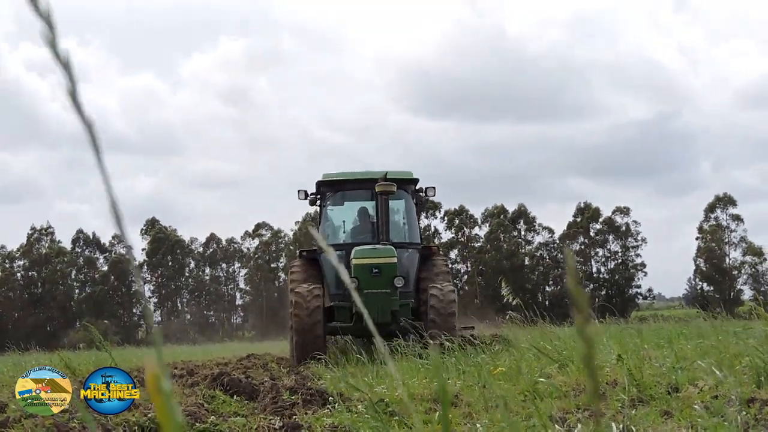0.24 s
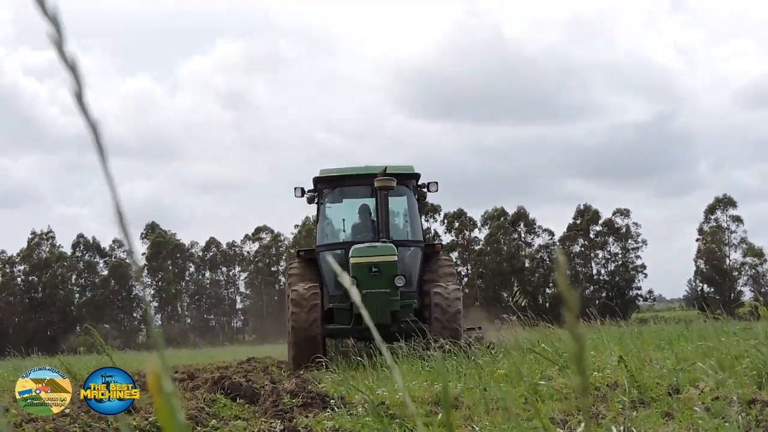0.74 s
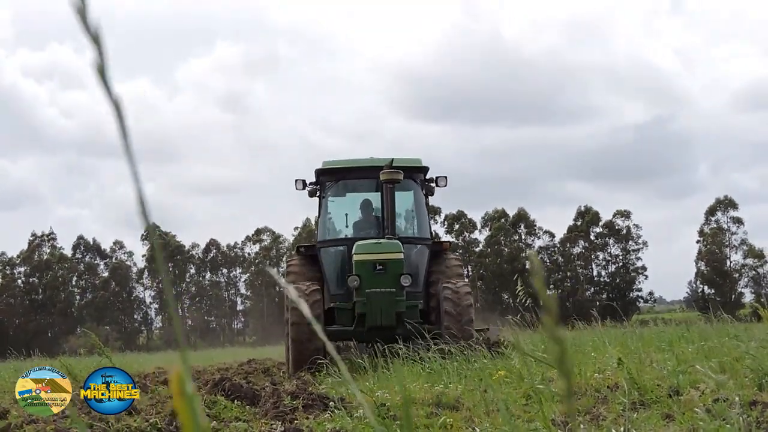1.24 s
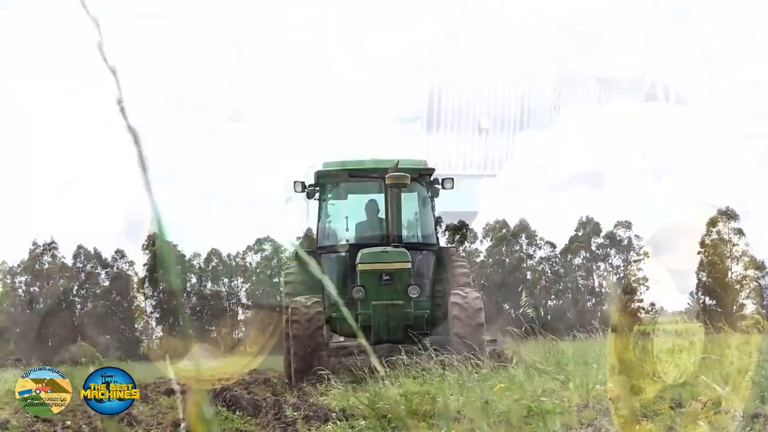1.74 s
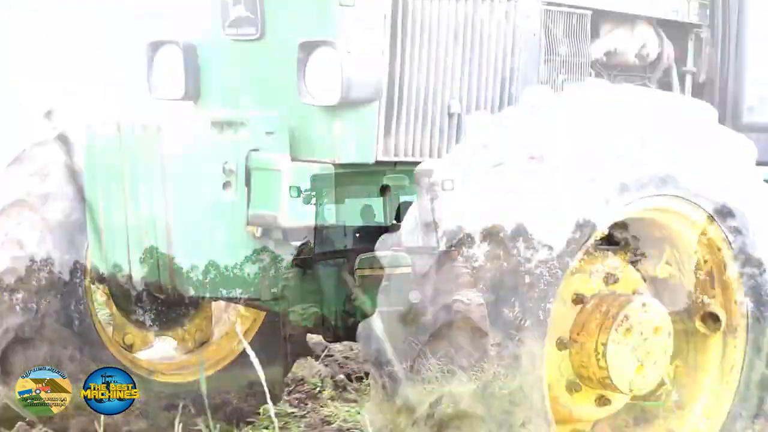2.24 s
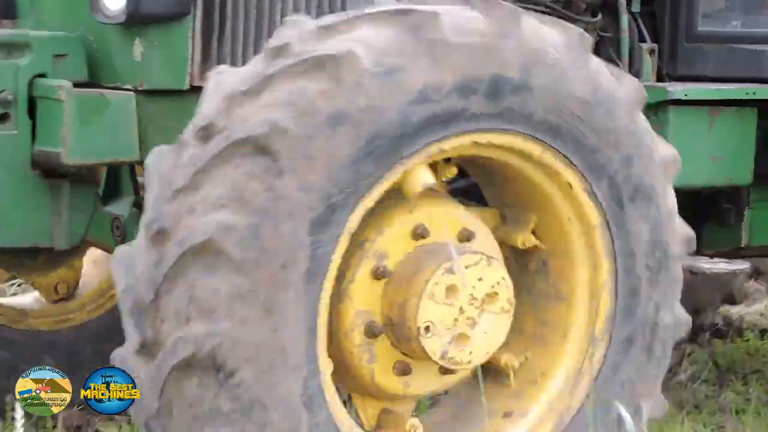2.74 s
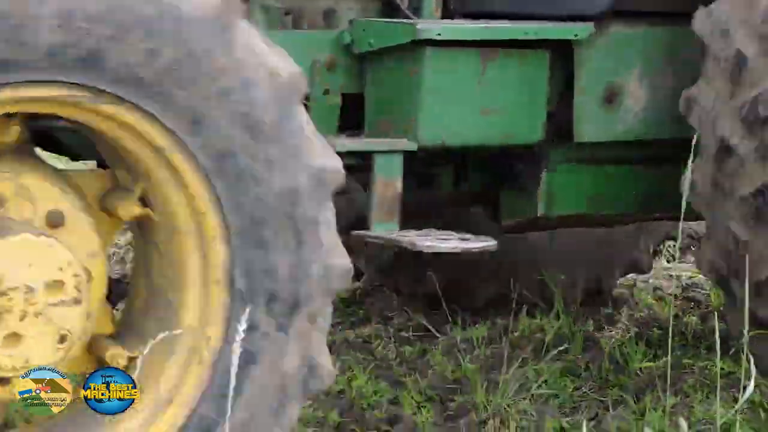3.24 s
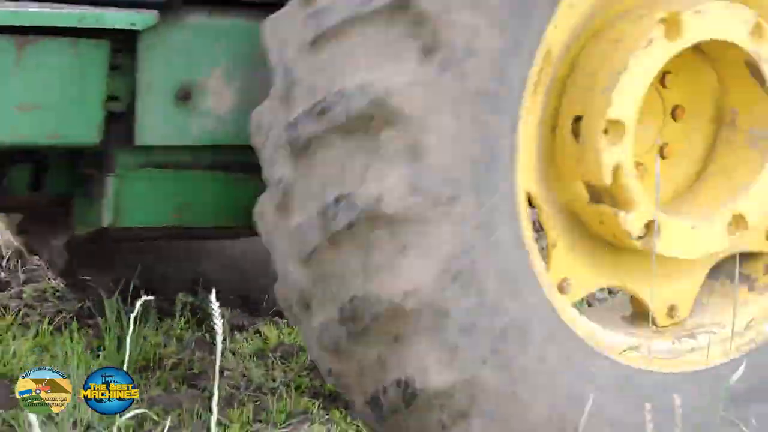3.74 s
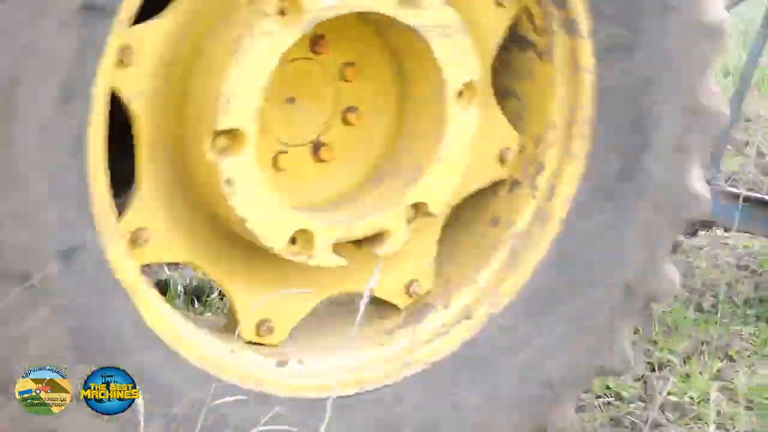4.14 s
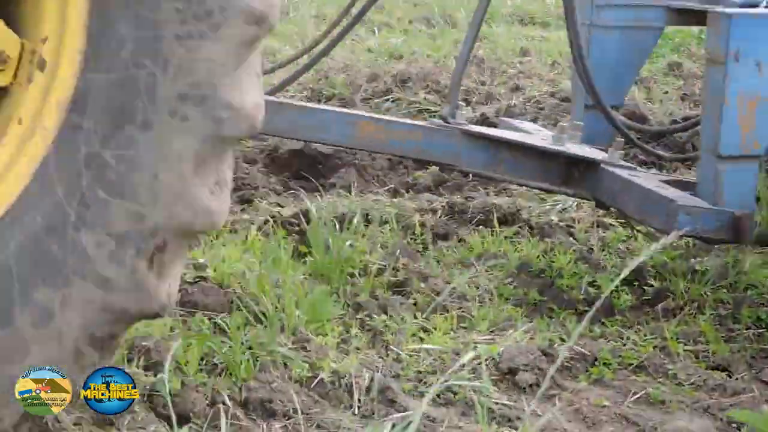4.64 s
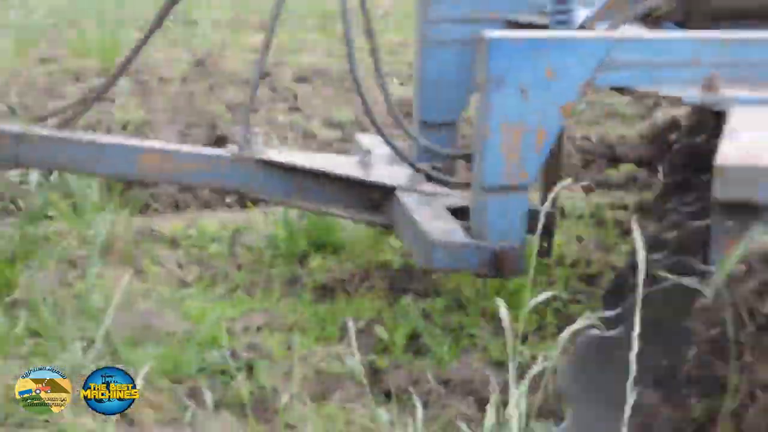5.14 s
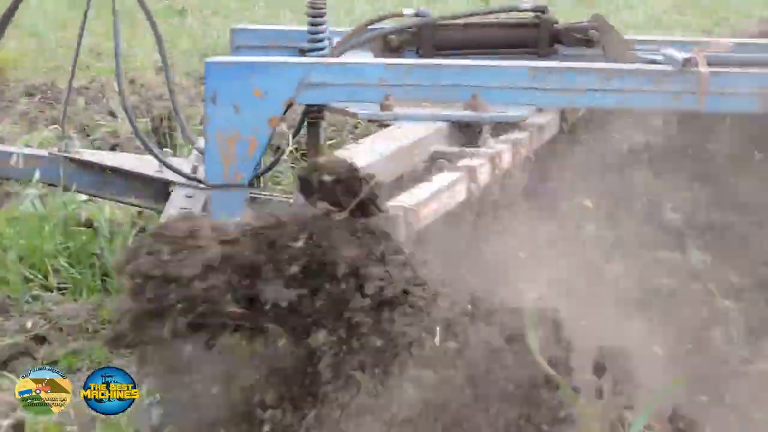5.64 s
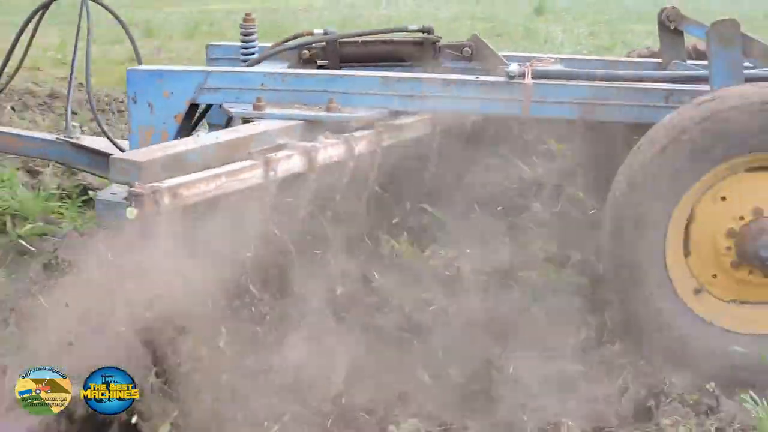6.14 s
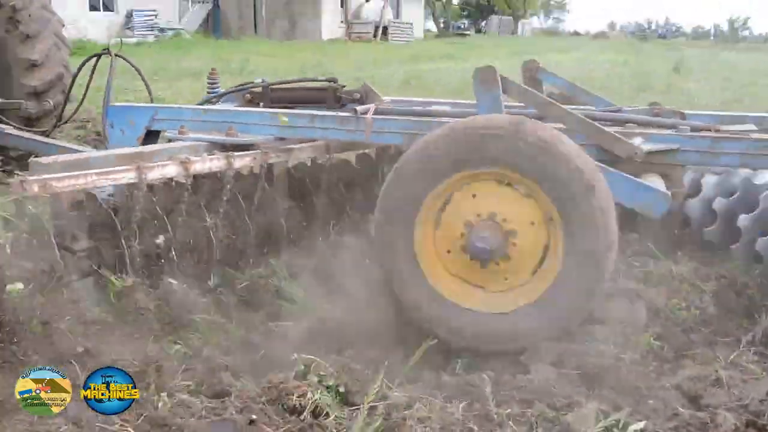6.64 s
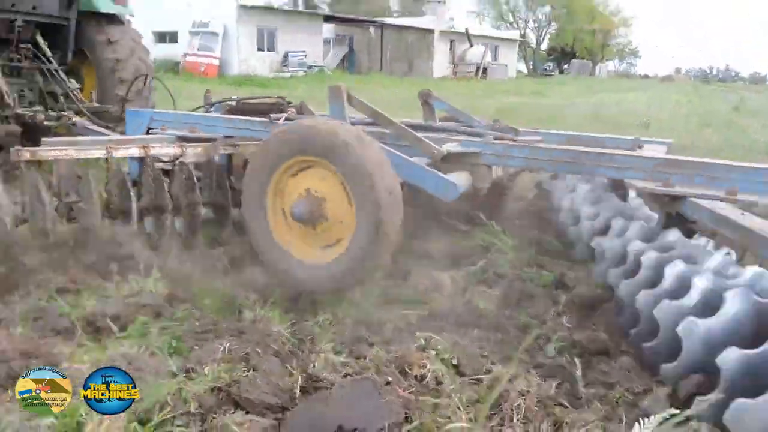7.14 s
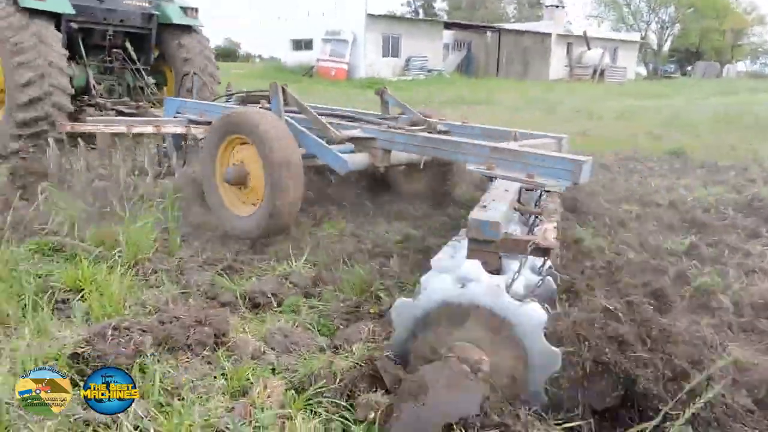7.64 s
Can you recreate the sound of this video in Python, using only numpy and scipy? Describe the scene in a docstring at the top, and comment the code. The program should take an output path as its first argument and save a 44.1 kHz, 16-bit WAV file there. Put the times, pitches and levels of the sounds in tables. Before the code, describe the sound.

A diesel tractor drones far off in wind, fades to silence, then cuts in close, clattering past as harrow discs crumble and thump through soil.

```python
"""A windy open field, where a diesel tractor pulls a disc harrow: first heard head-on from afar, fading
out, then close by, swelling and receding past a stereo microphone and labouring as the discs bite.
Each firing gives an exhaust throb (sines at orders of the firing rate), a knock in the block, a tick and
an injector ping (gated, coloured noise). The discs crumble and scrape the soil (grainy noise), stones
ring, clods thump down (decaying tones), a low swoop rises, and wind noise buffets the microphone ports."""
import sys
import numpy as np
from scipy import signal
from scipy.fft import rfft, irfft, next_fast_len
from scipy.io import wavfile
from scipy.ndimage import uniform_filter1d, map_coordinates

SR = 44100
rng = np.random.default_rng(int(sys.argv[2]) if len(sys.argv) > 2 else 0)


def put_to_file(sound):
    """Save the sound as 16-bit audio at rate SR, in the file named by the first command-line argument."""
    columns = np.atleast_2d(sound).T  # one column per channel
    safe = np.clip(columns, -1, 1)
    whole_steps = np.round(safe * 32767)
    wavfile.write(sys.argv[1], SR, whole_steps.astype(np.int16))


N = 347508
TIME = np.arange(N) / SR
FADE_END_S = 2.0  # end of the far view

# Engine speed, surging over the bumps and sagging as the discs bite.
# Each row: time in seconds, firings per second [Hz].
FIRING_RATE = [(0, 61.7), (0.75, 63.8), (1.6, 62.5), (2.1, 61.5), (2.4, 64.1), (2.62, 60.8), (2.87, 62.4),
               (3.08, 61.3), (3.39, 61.1), (3.69, 63.4), (3.9, 59.9), (4.09, 62.9), (4.58, 60.7),
               (4.75, 63), (5.05, 61.6), (5.4, 59.9), (5.8, 59.1), (6.7, 61.4), (7.88, 63.2)]
# The four cylinders in firing order.
# Each row: knock, tick, injector ping and head-on rap, all relative levels in dB.
CYLINDER_LEVELS = [(-3, 11, -1, 1), (-3.5, 7.5, 4, -0.5), (-3.5, 11, -15.5, -0.5), (-4.5, 9.5, 1.5, 2)]
# Share of each side of the engine that faces the microphone; the rest is flank.
# Each row: time in seconds, front share 0-1, rear share 0-1.
FACING = [(0, 1, 0), (2, 1, 0), (2.03, 0, 0), (3.3, 0, 0), (4.1, 0, 1), (7.88, 0, 1)]
# Left-right likeness of the engine, head-on from afar. Each row: frequency in Hz, correlation 0-1.
LIKENESS_AFAR = [(100, 1), (1000, 0.9), (6000, 0.91), (12000, 0.79)]
# Passage of the knock: level afar in dB, closest level in dB, closest time in seconds,
# approach in seconds, retreat in seconds, steepness as an exponent.
KNOCK_PASSAGE = (-32.5, -20.5, 3.5, 2, 2.0, 4)


def amp(db):
    """The decibel law: 20 dB for each factor of ten in amplitude."""
    return 10 ** (np.asarray(db) / 20)


def unit(x):
    """Normalisation of power: scale to rms 1."""
    return x / np.sqrt(np.mean(x ** 2) + 1e-20)


def along(points, hz):
    """Interpolation of (Hz, value) points on a logarithmic frequency axis."""
    f, v = np.transpose(points)
    return np.interp(np.log(hz + 1), np.log(f + 1), v)


def curves(rows):
    """Linear interpolation in time: one curve for each column after the time."""
    s, *columns = np.transpose(rows)
    return [np.interp(TIME, s, column) for column in columns]


def wobble(rate):
    """Slow random modulation: a smooth curve through random knots, rate of them a second."""
    coarse = TIME[::32]
    knots = rng.standard_normal(int(N * rate / SR) + 4)
    return np.interp(TIME, coarse, map_coordinates(knots, [coarse * rate]))


def filtered(x, response):
    """Linear filtering: the spectrum of x is multiplied by a response of frequency."""
    size = x.shape[-1]
    m = next_fast_len(size + 8192)
    return irfft(rfft(x, m) * response(np.fft.rfftfreq(m, 1 / SR)), m)[..., :size]


def stereo(pair, alike):
    """Partial coherence: mid and side from two unrelated signals set the left-right correlation."""
    turn = lambda hz: np.arccos(np.clip(along(alike, hz), -1, 1)) / 2
    mid = filtered(pair[0], lambda hz: np.cos(turn(hz)))
    side = filtered(pair[1], lambda hz: np.sin(turn(hz)))
    return np.array([mid + side, mid - side])


def colour(spectrum, resonances=()):
    """Spectral shaping: narrow peaks and notches, in dB, on top of a smooth spectrum."""
    peaks = lambda hz: sum(db / (1 + (2 * (hz - f) / width) ** 2) for f, width, db in resonances)
    return lambda hz: amp(along(spectrum, hz) + peaks(hz))


def panel_modes(depth_db, spacing_hz=85):
    """Modal overlap: countless small modes of sheet metal ripple a response."""
    knots = rng.standard_normal(int(SR / spacing_hz) + 4)
    depth = lambda hz: depth_db * np.interp(hz, [400, 1200, 4000, 8000], [0, 1, 1, 0.59])
    return lambda hz: amp(depth(hz) * map_coordinates(knots, [hz / spacing_hz]))


def bursts(rows, octaves, alike, attack, grain_db):
    """Band-limited noise in short grainy swells, each around its own centre.

    Each row: centre time in seconds, level in dB, centre frequency in Hz, length in seconds.
    The attack is a share of the length.
    """
    grains_per_s = 4500
    out = np.zeros((2, N + SR))
    t = np.arange(-SR // 8, SR // 8) / SR
    for s, db, centre_hz, length in rows:
        band = lambda hz: 1 / (1 + (np.log2((hz + 1) / centre_hz) / octaves) ** 4)
        swell = np.exp(-2 * (t / np.where(t < 0, attack * length, length)) ** 2)
        # grain strength varies from one millisecond to the next
        knots = np.clip(rng.standard_normal(len(t[::40])), -2, 2)
        grain = amp(grain_db * np.interp(t, t[::40], knots))
        grain = grain * (rng.random(len(t)) < grains_per_s / SR)
        noise = filtered(grain * rng.standard_normal((2, len(t))), band)
        puff = stereo(noise, [(100, alike)]) * swell
        level = amp(db) * np.sqrt(np.mean(swell ** 2))
        out[:, round((s + t[0]) * SR):][:, :len(t)] += level * unit(puff)
    return out[:, :N]


def wind():
    """Turbulence: slow eddies rumble and small ones flutter, only partly alike at the two ports."""
    # Strength of the wind on the ports. Each row: time in seconds, rumble level in dB.
    strength = [(0, -31.5), (0.62, -28.5), (0.82, -28.5), (1.3, -29), (3.2, -27.5), (4.3, -31),
                (5.5, -24.5), (6.3, -25), (7.88, -23)]
    # Drifting left-right balance of the wind noise.
    # Each row: time in seconds, left-right difference in dB.
    balance_drift = [(0, 3.5), (1, -8.5), (2.1, 2), (4.5, 4), (5.3, 13), (6.5, -6), (7.2, 10.5),
                     (7.88, 4.5)]
    # Spectra of slow and small eddies. Each row: frequency in Hz, relative density in dB per Hz.
    rumble_spectrum = [(10, -24), (25, 2.5), (45, -3), (80, -2), (140, -2.5), (300, -45), (800, -55.5)]
    flutter_spectrum = [(40, -33.5), (100, -1), (170, 1.5), (280, 0), (450, -14.5), (800, -13.5),
                        (2000, -70), (5000, -94)]
    # Single buffets. Each row: time in seconds, level in dB ahead of a common boost,
    # centre frequency in Hz, length in seconds.
    buffet_rows = [(.755, -15, 55.4, 0.022), (.88, -25.5, 135, 0.024), (1.17, -21.5, 92, 0.045),
                   (2.08, -17, 64.5, 0.058), (2.56, -27, 130, 0.029), (5.53, -20, 140, 0.05),
                   (6.14, -18, 108.7, .03), (6.585, -21.5, 110, 0.027), (6.765, -16, 70, 0.019),
                   (6.83, -24, 210, 0.034), (6.9, -20.5, 180, 0.025), (7.58, -17, 110, 0.023),
                   (7.77, -20.5, 171, 0.059), (7.855, -15.5, 140, 0.033)]
    mean_flutter_db, flutter_growth = -39.5, 2.7  # growth in dB for each dB of wind

    def eddies(spectrum, alike):
        noise = stereo(rng.standard_normal((2, N)), [(100, alike)])
        return unit(filtered(noise, colour(spectrum)))

    rumble_db, = curves(strength)
    flutter_db = mean_flutter_db + flutter_growth * (rumble_db - rumble_db.mean())
    rumble = amp(rumble_db + 0.65 * wobble(12)) * eddies(rumble_spectrum, alike=0.62)
    lumps = unit(amp(1.9 * np.array([wobble(35), wobble(35)])))
    flutter = amp(flutter_db) * lumps * eddies(flutter_spectrum, alike=0.67)
    buffets = amp(1.5) * bursts(buffet_rows, octaves=0.96, alike=0.19, attack=1.0, grain_db=4.5)
    balance = amp(np.outer([1, -1], curves(balance_drift)[0]) / 2)
    return (rumble + flutter + buffets) * balance


def swoop():
    """Frequency glide: a brief, low whoop of harmonics rises, roughened by random level and phase."""
    # Each row: time in seconds, pitch in Hz, level in dB.
    glide = [(2.11, 62.9, -26.5), (2.138, 69, -18.5), (2.16, 116, -19), (2.175, 138, -16.5),
             (2.19, 189, -18), (2.2, 215, -37)]
    # Each row: multiple of the pitch, relative level in dB.
    partials = [(1, -4.5), (2, -3.5), (3, -14)]
    hz, db = curves(glide)
    sounding = (TIME > glide[0][0]) & (TIME < glide[-1][0])
    turns = np.cumsum(hz) / SR
    whoop = 0
    for multiple, partial_db in partials:
        level = amp(db + partial_db + 1.7 * wobble(120))
        whoop = whoop + level * np.sin(2 * np.pi * multiple * turns + 0.45 * wobble(130))
    return sounding * whoop


def soil():
    """Granular fracture: clods burst into crumbs and a hiss of fine dirt; at times a disc grinds on grit."""
    # Soil breaking over the discs as they pass. Each row: time in seconds, level in dB.
    crumb_level = [(0, -68.5), (4.4, -33), (5.3, -35.5), (5.8, -29), (6.3, -26.5), (6.43, -23), (6.58, -23),
                   (6.62, -29.5), (6.82, -27.5), (6.87, -38), (7.1, -37.5), (7.3, -31.5), (7.55, -34.5),
                   (7.88, -48)]
    # Fine dirt thrown toward the microphone by the front discs. Each row: time in seconds, level in dB.
    dirt_level = [(5.45, -58.5), (5.8, -40), (6.2, -39), (6.42, -33), (6.58, -42), (6.62, -45), (6.83, -41),
                  (6.88, -49), (7.3, -51), (7.88, -64)]
    # Spectra of crumbs and dirt. Each row: frequency in Hz, relative density in dB per Hz.
    crumb_spectrum = [(200, 13.5), (500, 5), (780, -0.5), (1050, 1.5), (1500, 5.5), (2300, 3), (3200, -2.5),
                      (4300, -9), (7000, -7), (12000, -14), (16000, -26)]
    dirt_spectrum = [(1500, -17), (3500, -1), (6200, 4), (9000, -8), (14000, -7), (16000, -18)]
    # Discs grinding through grit. Each row: time in seconds, level in dB ahead of a common cut,
    # centre frequency in Hz, length in seconds.
    scrape_rows = [(6.386, -24, 1700, .008), (6.422, -21, 1700, 0.011), (6.438, -27, 2700, .014),
                   (6.815, -30, 2300, .025), (6.894, -29, 4800, 0.012), (6.965, -31, 3200, 0.042),
                   (7.234, -31.5, 2770, 0.029), (7.379, -35, 4200, .01), (7.394, -23.5, 2450, 0.023),
                   (7.411, -22, 2380, 0.023), (7.573, -31, 2980, 0.013), (7.693, -29.5, 4480, 0.029),
                   (7.718, -23, 2160, 0.03)]
    sizes = amp(2.4 * np.minimum(rng.exponential(size=N), 3))
    grains = (rng.random(N) < 9000 / SR) * sizes * rng.standard_normal((2, N))  # 9000 a second
    crumbs = unit(filtered(stereo(grains, [(1000, 0.48)]), colour(crumb_spectrum)))
    hiss = stereo(rng.standard_normal((2, N)), [(1000, 0.2)])
    dirt = unit(filtered(hiss, colour(dirt_spectrum)))
    clods = amp(1.8 * wobble(40))
    scrapes = bursts(scrape_rows, octaves=1.05, alike=0.5, attack=0.45, grain_db=3.3)
    grinding = filtered(scrapes, panel_modes(depth_db=2.2, spacing_hz=170))
    shower = amp(curves(crumb_level)[0]) * crumbs + amp(curves(dirt_level)[0]) * dirt
    return clods * shower + amp(-2.0) * grinding


def stones(ring_share=0.37, ring_t60=0.054, crack_t60=0.0092, debris_share=.55, debris_t60=.07):
    """Impact excitation: a stone cracks against a disc, rings it briefly and scatters chips."""
    # Each row: time in seconds, level in dB, ringing frequency in Hz.
    impacts = [(6.385, -24, 3400), (6.889, -17.5, 5650), (6.975, -29.5, 5660), (7.059, -29.5, 5700),
               (7.231, -28, 7500), (7.386, -21, 4470), (7.688, -27.5, 6740), (7.701, -16.5, 6100)]
    # Spectrum of the crack and chips. Each row: frequency in Hz, gain in dB.
    crack_spectrum = [(500, -13.5), (2000, 3), (6000, 0), (10000, -14), (16000, -16)]
    out = np.zeros((2, N + SR))
    t = np.arange(SR // 10) / SR
    decay = lambda t60: amp(-60 * t / t60)  # falls 60 dB in t60 seconds
    for s, db, hz in impacts:
        ring = ring_share * np.sin(2 * np.pi * hz * t) * decay(ring_t60)
        chips = (rng.random(len(t)) < 1500 / SR) * debris_share * decay(debris_t60)
        noise = stereo(rng.standard_normal((2, len(t))), [(1000, .6)])
        crack = noise * (0.55 * decay(crack_t60) + 2 * chips)
        out[:, round(s * SR):][:, :len(t)] += amp(db) * (ring + filtered(crack, colour(crack_spectrum)))
    return out[:, :N]


def thumps(rise_cycles=0.4, soft_cycles=0.26, patter_cycles=0.73, puff=0.24, pan_db=3):
    """Heavily damped oscillation: a firm push that rings for a cycle or so, with a puff of loose earth."""
    # Dull thumps, as of clods landing close by.
    # Each row: time in seconds, level in dB, frequency in Hz, decay in cycles.
    landings = [(5.532, -18, 230, .6), (5.558, -16, 160, 1.2), (5.638, -16, 110, 0.77),
                (5.835, -11.5, 240, .6), (6.153, -9.5, 130, 0.36), (6.178, -10, 150, .6),
                (6.221, -12, 250, .5), (6.424, -12, 670, 1.8), (6.427, -12.5, 151, 1.2),
                (6.568, -13, 259, .6), (6.599, -12, 170, 0.9), (6.70, -9, 90, .7), (6.828, -15, 302, 1),
                (6.838, -12.5, 238, 0.87), (6.847, -13, 253, .6), (6.879, -16.5, 201, 0.89),
                (6.895, -16.5, 260, 1.4), (6.908, -20, 220, 0.91), (6.955, -15, 207, 1),
                (7.027, -13.5, 300, 0.53), (7.035, -11, 178, 0.81), (7.040, -13, 270, .6),
                (7.052, -12, 200, .9), (7.103, -13.5, 170, 1.2), (7.172, -15, 220, 1.5),
                (7.360, -11.5, 130, 0.92), (7.448, -12, 231, .8), (7.465, -12.5, 283, 0.72),
                (7.476, -14, 240, 0.85), (7.493, -18.5, 398, .7), (7.581, -17.5, 332, 0.66),
                (7.619, -19, 230, 1.4), (7.699, -9, 295, 0.52), (7.724, -15.5, 244, 0.65),
                (7.734, -10.5, 218, 1.2), (7.862, -12.5, 190, .8)]
    # smaller thumps patter at random while the discs go by; median level and pitch
    patter_start_s, patter_per_s, patter_db, patter_hz = 5.1, 30, -24, 310
    chance = rng.standard_normal((160, 3))
    gaps = np.abs(chance[:, 0]) / np.sqrt(2 / np.pi) / patter_per_s
    times = patter_start_s + np.cumsum(gaps)
    levels = patter_db + 2.1 * chance[:, 1]
    pitches = patter_hz * np.exp(0.33 * chance[:, 2])
    patter = np.transpose([times, levels, pitches, np.full(len(times), patter_cycles)])
    out = np.zeros((2, N + SR))
    t = np.arange(-SR // 50, SR // 20) / SR
    for s, db, hz, fall_cycles in [*landings, *patter[times < TIME[-1]]]:
        cycles = hz * t
        rise = -(cycles / rise_cycles) ** 2
        fall = (soft_cycles - np.hypot(cycles, soft_cycles)) / fall_cycles
        shape = np.exp(np.where(t < 0, rise, fall))
        lowpass = signal.butter(3, min(2.6 * hz, SR / 4), fs=SR)
        earth = unit(signal.lfilter(*lowpass, rng.standard_normal((2, len(t)))))
        push = -shape * np.cos(2 * np.pi * cycles) + puff * np.sqrt(shape) * earth
        pan = np.array([[1], [-1]]) * (pan_db + 4.5 * rng.standard_normal()) / 2
        out[:, round((s + t[0]) * SR):][:, :len(t)] += amp(db + pan) * push
    return out[:, :N]


def passing(voice):
    """Spreading with distance: level in dB, steady from afar, then a swell as the tractor goes by."""
    afar_db, closest_db, closest_s, approach_s, retreat_s, steepness = voice
    away = np.abs(TIME - closest_s) / np.abs(np.where(TIME < closest_s, approach_s, retreat_s))
    swell_db = closest_db - 10 * np.log10(1 + away ** abs(steepness))
    return np.where(TIME < FADE_END_S, afar_db, swell_db)


def firing_gate(turns, cylinder_db, rise, decay, rest, scatter_db, jitter):
    """Impulsive excitation: an envelope jumps at each firing and dies to a resting share.

    Rise, decay and jitter are in firing cycles.
    """
    turns = turns + 2 + jitter * wobble(60)
    index, age = np.floor(turns).astype(int), turns % 1
    scatter = scatter_db * rng.standard_normal(N // 400)[index]
    size = amp(np.take(cylinder_db, index, mode="wrap") + scatter)
    blow = unit(size * (1 - np.exp(-age / rise)) * np.exp(-age / decay))
    return unit(np.sqrt(blow ** 2 + rest ** 2))


def exhaust(turns, flicker_db=2.0, dispersion=1.05):
    """Periodic excitation: the pipe throbs on orders of the firing rate, and dispersion smears each puff."""
    # Passage of the exhaust note, one row for each of the orders 1 to 4.
    # Each row: level afar in dB, closest level in dB, closest time in seconds,
    # approach in seconds, retreat in seconds, steepness as an exponent.
    order_passages = [(-25, -22, 2.1, 2.5, 2.05, 1.25), (-40, -27, 4.36, 0.82, 0.72, 4.6),
                      (-35, -25.5, 3.6, 1.44, 0.54, 1.6), (-46, -31, 3.94, 4.4, 2.1, 3.6)]
    # Weaker orders of the shaking engine; the fractions come from unequal cylinders.
    # Each row: multiple of the firing rate, level in dB against the knock ahead of a common cut.
    weak_orders = [(0.5, -22), (1.5, -17.5), (1.75, -30), (2.25, -20), (2.75, -25), (3.25, -21), (3.5, -17),
                   (3.75, -19.5), (4.5, -18.5), (5, -19), (5.25, -18.5), (7, -19), (8, -28), (9, -24),
                   (10, -23.5), (11, -19)]
    # the governor answers a lasting sag below the set speed with more fuel, a little late
    set_hz, lag_s, smooth_s, throb_db_per_hz = 61.7, 0.52, 1, 3.5
    screened_db = 12  # from the front, the bonnet screens the weak orders

    def tone(order, drift):
        phase = 2 * np.pi * order * turns - dispersion * order ** 2 + drift * wobble(7)
        return np.sqrt(2) * np.sin(phase)

    lasting_hz = uniform_filter1d(curves(FIRING_RATE)[0], int(smooth_s * SR))
    sag_hz = np.maximum(set_hz - np.interp(TIME - lag_s, TIME, lasting_hz), 0)
    throb_db = passing(order_passages[0]) + throb_db_per_hz * sag_hz + 1.2 * wobble(14)
    throb = amp(throb_db) * tone(1, drift=0.22)
    hum = 0
    for order, voice in enumerate(order_passages[1:], 2):
        hum = hum + amp(passing(voice) + flicker_db * wobble(12)) * tone(order, drift=0.16)
    weak = sum(amp(db + 2.5 * wobble(4)) * tone(order, drift=.45) for order, db in weak_orders)
    weak_db = passing(KNOCK_PASSAGE) - 4.0 - screened_db * curves(FACING)[0]
    return throb + hum + amp(weak_db) * weak


def working_cycle(turns, size=2800, low_hz=300, top_hz=1300):
    """Periodicity of the four-firing cycle: the part of the shaking that comes back alike."""
    place = turns / len(CYLINDER_LEVELS) % 1 * size
    pattern = map_coordinates(rng.standard_normal(size), [place], mode="wrap")
    highpass = lambda hz: hz ** 2 / (hz ** 2 + low_hz ** 2)
    return filtered(pattern, lambda hz: highpass(hz) / np.sqrt(1 + (hz / top_hz) ** 2))


def rocking(x):
    """Modal directivity: as the tractor rocks, one set of panel modes or another faces the microphone."""
    share = (1 + np.tanh(2 * wobble(9))) / 2
    return sum(part * filtered(x, panel_modes(depth_db=2.2)) for part in (share, 1 - share))


def clatter(turns, split_hz=3500, repeat=1.29):
    """Structure-borne sound: each firing knocks the block, just after a brighter tick; head-on, one rap."""
    # Passage of the tick: level afar in dB, closest level in dB, closest time in seconds,
    # approach in seconds, retreat in seconds, steepness as an exponent.
    tick_passage = (-40, -24.5, 5.5, 5, 0.15, 1.5)
    # Left-right likeness close by. Each row: frequency in Hz, correlation 0-1.
    likeness_near = [(100, 0.92), (700, 0.94), (2000, 0.74), (4300, 0.92), (7000, 0.63), (12000, 0.42)]
    # Colour of the engine from three sides. Each row: frequency in Hz, relative density in dB per Hz.
    front_spectrum = [(100, -29), (220, 6.5), (290, 0.5), (400, -17.5), (700, -7), (1200, -4), (2000, -5),
                      (2800, -11.5), (3900, -17.5), (5200, -17.5), (6500, -17), (8000, -19.5), (12500, -25),
                      (14300, -38.5), (15500, -63)]
    flank_spectrum = [(100, -24), (200, 9.5), (300, 1), (420, -6), (570, -2.5), (730, -1), (1000, -1),
                      (1400, -0.5), (2400, 0), (3400, -3.5), (6500, -6.5), (9500, -9.5), (12000, -10),
                      (14000, -18), (15500, -29)]
    rear_spectrum = [(100, -15), (180, 7.5), (300, 3), (570, -5.5), (780, -0.5), (1050, -4.5), (1500, 2),
                     (2300, -1.5), (3400, -2), (5200, -10), (7000, -9), (9300, -13.5), (11800, -10.5),
                     (15500, -21)]
    # Peaks and notches of the engine heard head-on, as from an echo.
    # Each row: frequency in Hz, width in Hz, boost in dB.
    head_on_ripples = [(845, 100, 7), (967, 67, -16.5), (1090, 60, 1), (1335, 79, 6), (1445, 63, -17.5),
                       (1660, 40, 2), (1840, 93, 6.5), (2170, 73, 5), (2450, 99, 3), (2690, 310, 8.5),
                       (3260, 68, 2), (3380, 160, 6.5), (3750, 200, 4), (4390, 240, 4.5), (4830, 260, 3),
                       (6300, 900, 4)]
    # Resonances of the bare block, and of cab and gearbox heard from behind.
    # Each row: frequency in Hz, width in Hz, boost in dB.
    casting_modes = [(440, 40, 6.5), (856, 100, 4), (1044, 147, -13), (1322, 140, 6.5), (1457, 62, 2.5),
                     (2180, 250, 4), (4480, 240, 4), (5320, 300, -5), (5500, 160, 2), (6200, 600, 3.5),
                     (7940, 470, 5)]
    gearbox_modes = [(464, 36, 7.5), (845, 81, 5.5), (1390, 65, 1.5), (1760, 25, 1.5), (2120, 370, 3.5),
                     (4550, 440, 4.5), (6330, 710, 4), (7620, 82, 6.5)]
    knock_db, tick_db = passing(KNOCK_PASSAGE), passing(tick_passage)
    knock_sizes, tick_sizes, _, rap_sizes = np.transpose(CYLINDER_LEVELS)
    front, rear = curves(FACING)
    knock_gate = firing_gate(turns + 0.11, knock_sizes, rise=0.38, decay=0.44, rest=0.7,
                             scatter_db=1.3, jitter=0.013)
    tick_gate = firing_gate(turns + 0.18, tick_sizes, rise=0.051, decay=0.52, rest=1.0,
                            scatter_db=1, jitter=0.025)
    rap_gate = firing_gate(turns + 0.08, rap_sizes, rise=0.08, decay=0.26, rest=1.1,
                           scatter_db=1.3, jitter=0.01)

    def shaking():
        afar = stereo(rng.standard_normal((2, N)), LIKENESS_AFAR)
        near = stereo(rng.standard_normal((2, N)), likeness_near)
        return front * afar + (1 - front) * near

    knocks = shaking() + repeat * working_cycle(turns)
    knocks = knocks * (front * rap_gate + (1 - front) * knock_gate)
    ticks = shaking() * (front * rap_gate + (1 - front) * tick_gate)
    knocks, ticks = rocking(np.array([knocks, ticks]))
    low = lambda hz: 1 / np.sqrt(1 + (hz / split_hz) ** 10)
    high = lambda hz: np.sqrt(1 - low(hz) ** 2)
    sides = [(front, colour(front_spectrum, head_on_ripples)),
             (1 - front - rear, colour(flank_spectrum, casting_modes)),
             (rear, colour(rear_spectrum, gearbox_modes))]
    out = 0
    for share, body in sides:
        knock = unit(filtered(knocks, lambda hz: body(hz) * low(hz)))
        tick = unit(filtered(ticks, lambda hz: body(hz) * high(hz)))
        out = out + share * (amp(knock_db) * knock + amp(tick_db) * tick)
    return out


def injectors(turns, width_hz=1500, low_hz=6400, low_width_hz=500):
    """Line resonance: injector lines ping at each delivery; only their lowest mode carries to the front."""
    # Passage of the ping: level afar in dB, closest level in dB, closest time in seconds,
    # approach in seconds, retreat in seconds, steepness as an exponent.
    ping_passage = (-50.5, -33.5, 5, 2.5, 0.5, 3.5)
    # Centre of the ping, rising slightly, then dropping after 4.1 s.
    # Each row: time in seconds, frequency in Hz.
    ping_centre = [(2, 11300), (3.1, 11720), (4.1, 11900), (4.4, 11620), (4.75, 10900), (5.5, 10800)]
    ping_sizes = np.transpose(CYLINDER_LEVELS)[2]
    gate = firing_gate(turns + 0.063, ping_sizes, rise=0.029, decay=0.18, rest=.08,
                       scatter_db=1.5, jitter=0.015)
    band = lambda hz, width: 1 / (1 + (hz / width) ** 4)
    low_noise = stereo(rng.standard_normal((2, N)), LIKENESS_AFAR) * gate
    low = unit(filtered(low_noise, lambda hz: band(hz - low_hz, low_width_hz)))
    # two lowpassed noises on carriers in quadrature make a band that follows the centre
    base_noise = stereo(rng.standard_normal((2, 2, N)), [(100, 0.93)]) * gate
    in_phase, quadrature = filtered(base_noise, lambda hz: band(hz, width_hz)).swapaxes(0, 1)
    phase = 2 * np.pi * np.cumsum(curves(ping_centre)[0]) / SR
    high = unit(in_phase * np.cos(phase) + quadrature * np.sin(phase))
    front = curves(FACING)[0]
    return amp(passing(ping_passage)) * (front * low + (1 - front) * high)


def shaded(x):
    """Acoustic shadow: once the engine is past, the microphone's body shades the right port in some bands."""
    # Each row: frequency in Hz, left-right difference in dB.
    shade_bands = [(1500, -1.5), (2500, 3.5), (4700, 0.5), (7000, 1), (8300, 6), (10000, 5.5), (12000, 2),
                   (14500, 3.5)]
    rear = curves(FACING)[1]
    shade = lambda hz: amp(np.outer([1, -1], along(shade_bands, hz)) / 2)
    return (1 - rear) * x + rear * filtered(x, shade)


def dips():
    """Amplitude modulation: the engine's level drops quickly at each dip and creeps back."""
    # Each row: time in seconds, depth in dB.
    dip_rows = [(0.8, 0.5), (2.171, 6.5), (4.08, 2), (7.05, 2.5)]
    fall_s, recover_s = 0.045, 0.13
    shape = lambda age: np.clip(1 + age / fall_s, 0, 1) * np.exp(-np.maximum(age, 0) / recover_s)
    return amp(-sum(db * shape(TIME - s) for s, db in dip_rows))


def tractor(hunting=0.0075):
    """Stereo localisation: delay and level place the engine, whose governed speed swings a little."""
    # Bearing of the engine.
    # Each row: time in seconds, lead of the left channel in ms, left-right difference in dB.
    bearing = [(0, 0.004, -1.5), (2, 0.004, -1.5), (2.2, -0.012, -1.7), (3.2, 0.003, -1.4),
               (4.1, 0.072, -0.2), (5.3, 0.12, 0.6), (6.3, 0.117, 0), (7.1, 0.08, -0.4), (7.88, 0.02, 0)]
    turns = np.cumsum(curves(FIRING_RATE)[0]) / SR + hunting * wobble(4)  # in firing cycles
    engine = exhaust(turns) + clatter(turns) + injectors(turns)
    left, right = dips() * shaded(engine)
    lead_ms, pan_db = curves(bearing)
    shift = lead_ms * SR / 1000 / 2  # samples, half for each channel
    delayed = lambda x, samples: map_coordinates(x, [np.arange(N) - samples])
    return np.array([delayed(left, -shift) * amp(pan_db / 2), delayed(right, shift) * amp(-pan_db / 2)])


def scene():
    """Superposition of tractor, harrow and wind in the open field."""
    return tractor() + soil() + stones() + thumps() + wind() + swoop()


def fader():
    """Gain control: a fade to silence, a hard cut back in for the close view, then a step down."""
    fade_start_s, fade_power = 1.017, 2.5
    cut_s, step_s, switch_s, step_db = 2.06, 4.733, 0.005, -7
    fade = np.clip((FADE_END_S - TIME) / (FADE_END_S - fade_start_s), 0, 1) ** fade_power
    switch = lambda s: np.clip((TIME - s) / switch_s, 0, 1)
    return fade + switch(cut_s) * amp(step_db * switch(step_s))


def record(dry):
    """Transfer functions: the two ports differ in colour and phase; then come fader and band limit."""
    # Each row: frequency in Hz, left-right difference in dB.
    port_balance = [(60, -1.5), (200, 0.5), (400, 1.5), (700, 4.5), (1150, 7), (2000, -2.5), (4000, -2.5),
                    (6800, 0), (10500, -4.5), (14500, 1)]
    # The ports answer slightly out of step. Each row: frequency in Hz, lead of the left in radians.
    port_lead = [(30, .4), (60, 0.37), (200, 0.15), (500, 0.49), (1000, -0.25), (1700, -0.53),
                 (3000, 0.026), (8000, 0.17), (13000, 0.47)]
    top_hz = 15800
    port = lambda hz: amp(along(port_balance, hz) / 2) * np.exp(1j * along(port_lead, hz) / 2)
    heard = filtered(dry, lambda hz: np.array([port(hz), 1 / port(hz)]))
    return filtered(heard * fader(), lambda hz: 1 / (1 + (hz / top_hz) ** 400))


dry = scene()
out = record(dry)
put_to_file(out)
```